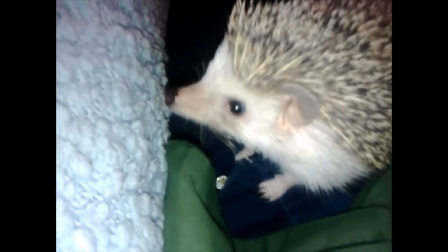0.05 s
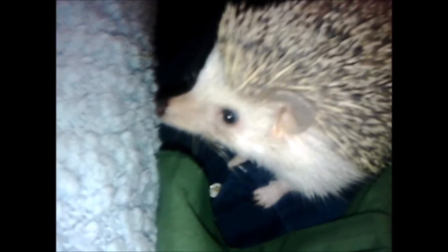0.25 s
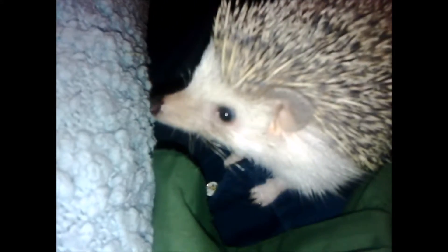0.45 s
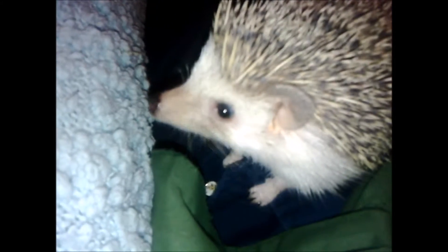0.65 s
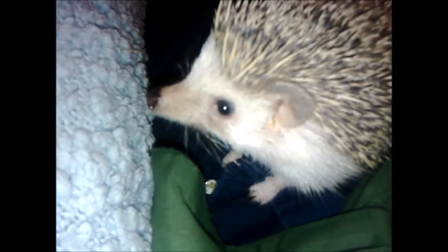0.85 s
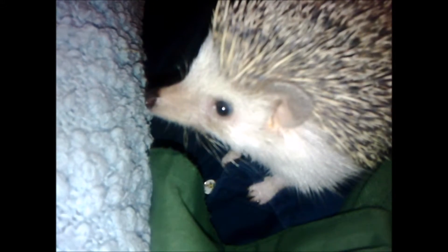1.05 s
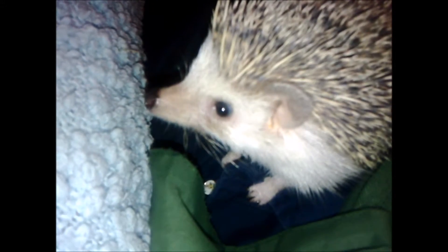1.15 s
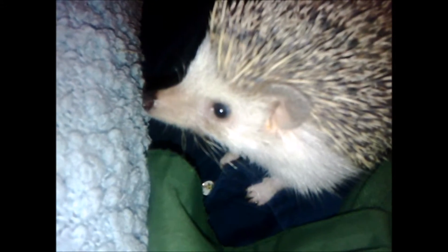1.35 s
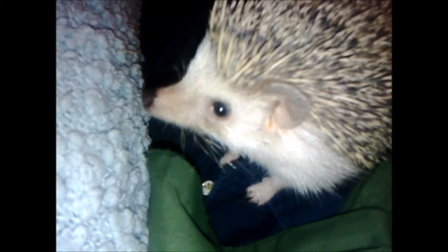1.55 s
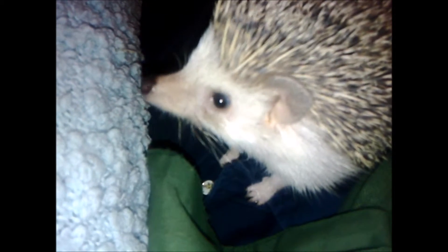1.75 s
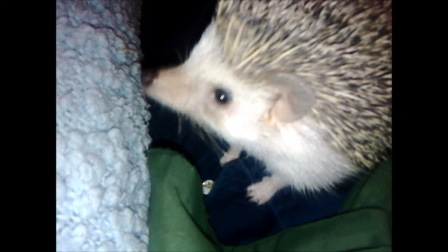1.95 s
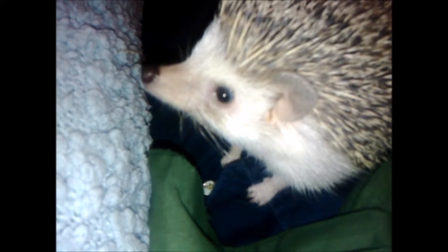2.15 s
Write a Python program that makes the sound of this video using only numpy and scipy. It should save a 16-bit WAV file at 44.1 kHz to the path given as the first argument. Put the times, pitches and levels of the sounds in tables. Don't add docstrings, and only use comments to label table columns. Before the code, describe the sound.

Crisp, hollow little clicks from a hedgehog nosing fleece, clustered early then sparse and faint, with a brief airy sniff and soft rustle at the start; very close stereo microphone, quiet room, steady hiss.

```python
import sys
import numpy as np
from scipy import signal
from scipy.fft import rfft, irfft
from scipy.io import wavfile

SR = 44100
rng = np.random.default_rng(int(sys.argv[2]) if len(sys.argv) > 2 else 0)


def transcribe(signal):
    frames = np.atleast_2d(signal).T
    limited = np.clip(frames, -1, 1)
    pcm = np.round(limited * 32767).astype(np.int16)
    wavfile.write(sys.argv[1], SR, pcm)


def undo_db(level):
    steps = np.asarray(level, float) / 20
    return 10 ** steps


N = 97020


def in_time(rows):
    times, values = np.transpose(rows)
    return np.interp(np.arange(N) / SR, times, values)


def rms_one(x):
    return x / np.sqrt(np.mean(x ** 2) + 1e-20)


def drift(rate_hz):
    r = np.exp(-2 * np.pi * rate_hz * 40 / SR)
    noise = rng.standard_normal(N // 40 + 2002)
    slow = signal.lfilter([1], [1, -2 * r, r * r], noise)[2000:]
    return np.interp(np.arange(N) / 40, np.arange(len(slow)), rms_one(slow))


def coloured(x, spectrum, patchy_db):
    hz, level_db = np.transpose(spectrum)
    octave = np.log2(np.maximum(np.arange(N // 2 + 1) * SR / N, 1))
    shaped = rfft(x) * undo_db(np.interp(octave, np.log2(hz), level_db, left=-80, right=-80))
    together = drift(16.5)
    total = np.zeros(N)
    for k in range(4, 15):
        band = irfft(shaped * np.clip(1 - abs(octave - k), 0, 1), N)
        total += band * undo_db(patchy_db * (0.74 * together + drift(54)))
    return rms_one(total)


def ring(x, hz, t60):
    r = undo_db(-60 / (t60 * SR))
    w = 2 * np.pi * hz / SR
    return signal.lfilter([0, np.sin(w)], [1, -2 * r * np.cos(w), r * r], x + 1e-18)


def low(x, hz):
    r = np.exp(-2 * np.pi * hz / SR)
    return signal.lfilter([1 - r], [1, -r], x)


def spread(mid, side, pan_db):
    return (mid + side * np.array([[1], [-1]])) * undo_db(np.array([[.5], [-.5]]) * pan_db)


def room():
    # (frequency [Hz], level [dB per Hz])
    rumble = [(12, -29), (20, -7), (48, -9), (124, 1), (195, -0.5), (312, -12.5), (401, -14), (1050, -19),
              (1500, -21.5), (1950, -58), (3300, -120)]
    mid = coloured(rng.standard_normal(N), rumble, patchy_db=2.5)
    side = coloured(rng.standard_normal(N), rumble, patchy_db=2.5)
    return undo_db(-61.5) * spread(mid, undo_db(-2.5) * side, 2.8)


def electronics():
    # (frequency [Hz], level [dB per Hz])
    alike = [(470, -34), (800, -25), (2350, -7.5), (5800, -8), (6650, -8), (7000, -6), (7830, -8),
             (12300, -4), (16000, -5.5)]
    # (frequency [Hz], level [dB per Hz])
    opposite = [(180, -49), (300, -12), (689, -15), (842, -24), (994, -26.5), (4910, -11), (7820, -13),
                (11500, -5), (16000, -8)]
    # (frequency [Hz], level [dB])
    whines = [(11041, -68), (12753, -68.5), (15256, -76)]
    whine_side_db = [10.5, 13.5, 12]
    # (time [s], level [dB])
    shared_level = [(0, 3.6), (.25, 1), (.6, -1.5), (.9, 0.5), (1.4, -0.1), (2.2, -0.5)]
    # (time [s], level [dB])
    gain = [(0, 2), (.3, -0.5), (.8, -0.5), (1.4, -0.7), (2.2, -1)]
    mid = undo_db(-56) * coloured(rng.standard_normal(N), alike, patchy_db=1.2)
    side = undo_db(-50) * coloured(rng.standard_normal(N), opposite, patchy_db=-1.2)
    for (hz, level_db), side_db in zip(whines, whine_side_db):
        height = np.sqrt(2) * undo_db(level_db + 0.4 * drift(17))
        phase = 2 * np.pi * hz * np.arange(N) / SR + 0.65 * drift(6)
        tone = height * np.sin(phase)
        mid = mid + tone
        side = side + undo_db(side_db) * tone
    return spread(undo_db(in_time(shared_level)) * mid, undo_db(in_time(gain)) * side, 0.7)


def rustle():
    # (frequency [Hz], level [dB per Hz])
    fleece = [(35, -34), (60, -4), (194, -2.5), (301, -15), (431, -4), (1060, -20.5), (1400, -13.5),
              (4340, -14.5), (7000, -30.5), (9100, -83), (15400, -120)]
    # (time [s], level [dB])
    effort = [(0.0, -55.5), (0.29, -64), (0.53, -66), (0.88, -76.5), (1.36, -71), (1.84, -74.5), (2.2, -70)]
    fibres_per_s = 440
    flicks = rng.random(N) < fibres_per_s / SR
    heights = undo_db(1.37 * np.minimum(rng.exponential(1, N), 5))
    ticks = flicks * heights * rng.choice([-1, 1], N)
    rubbing = rng.standard_normal(N) + undo_db(-5) * rms_one(ticks)
    mid = coloured(rubbing, fleece, patchy_db=1.2)
    side = undo_db(-6.5) * coloured(rng.standard_normal(N), fleece, patchy_db=4.0)
    return undo_db(in_time(effort) + 4.5) * spread(mid, side, 2)


def sniff():
    # (frequency [Hz], level [dB per Hz])
    breath = [(7500, -16), (9000, 3.5), (10500, -8), (13000, -5), (15500, -4)]
    end_s, fade_s = 0.2, 0.04
    fade = 1 / (1 + np.exp((np.arange(N) / SR - end_s) / fade_s * 3))
    mid = coloured(rng.standard_normal(N), breath, patchy_db=0.8)
    side = coloured(rng.standard_normal(N), breath, patchy_db=0.8)
    return undo_db(-61) * fade * spread(mid, undo_db(4) * side, 1.4)


def nudges():
    # (time [s], level [dB], frequency [Hz], length [s])
    nudge_table = [
        (0.105, -58.5, 440, 0.039),
        (1.256, -57.5, 470, 0.0079),
        (1.38, -60, 406, .012),
        (1.58, -62, 76.1, 0.016),
        (1.539, -57.5, 160, 0.026),
        (1.801, -60.5, 340, 0.0073),
        (1.841, -64.5, 590, 0.0082),
        (2.185, -56, 310, 0.031),
    ]
    t, noise = np.arange(N) / SR, rng.standard_normal(N)
    mid = np.zeros(N)
    for s, level_db, hz, length in nudge_table:
        swell = np.exp(-((t - s) / length) ** 2)
        tone = ring(ring(noise, hz, 4.0 / hz), hz, 4.0 / hz)
        mid += undo_db(level_db) * swell * rms_one(tone)
    return spread(mid, 0, 4.5)


def strike(at, level_db):
    taps = np.zeros((2, N))
    taps[:, at] = undo_db(level_db)
    return taps


def hollow_body(at, db, bright, sides):
    # (frequency [Hz], level [dB], 60 dB fade [s])
    modes = [(1466, -5.5, 0.008), (2340, -12, 0.0091), (3127, -12, 0.0072), (3930, -18, 0.0081),
             (5020, -26.5, 0.0048), (6050, -36, 0.0033), (8860, -35, 0.0023)]
    uneven_db = 0.6 * rng.normal(0, 1, (len(at), len(modes)))
    body = np.zeros((2, N))
    for k, (hz, level_db, t60) in enumerate(modes):
        tilt = bright * np.log2(hz / 1500)
        taps = strike(at, db + level_db + tilt + uneven_db[:, k] + sides)
        body -= (-1) ** k * ring(taps, hz, t60)
    body -= ring(strike(at, db - 17.5 + 1.28 * bright + sides), 4546, 0.0022)
    body = undo_db(7.5) * low(body - low(body, 2600), 8950)
    lag_s = 0.00004
    body[1] = np.roll(low(low(body[1], 3200), 7200), int(lag_s * SR))
    return body


def soft_thump(at, db, thump, sides):
    # (frequency [Hz], level [dB], 60 dB fade [s])
    modes = [(170.5, -14, 0.017), (333, -17.5, 0.021), (612, -16.5, 0.01)]
    soft = np.zeros((2, N))
    for k, (hz, level_db, t60) in enumerate(modes):
        taps = strike(at, db + level_db + thump + 0.72 * sides)
        soft += (-1) ** k * ring(taps, hz, t60)
    return signal.sosfilt(signal.butter(2, [93, 1800], "band", fs=SR, output="sos"), soft)


def noisy_tail(at, db, sides):
    t60_s = 0.045
    dying = signal.lfilter([1], [1, -undo_db(-60 / (t60_s * SR))], strike(at, db - 29.5 + sides) + 1e-18)
    tail = dying * rms_one(ring(rng.standard_normal(N), 1940, 0.00091))
    return signal.sosfilt(signal.butter(6, 4800, fs=SR, output="sos"), tail)


def clicks():
    # (time [s], peak [dB], brightness [dB per octave], thump [dB], left over right [dB])
    click_table = [(0.168, -39, -1, 0, 6), (0.208, -55, -6.48, -11, 14), (0.227, -14.5, -4.4, -5.5, 4.5),
                   (0.254, -46, -13, 10, 13), (0.306, -12.5, -1.3, -7, 5), (0.32, -20.5, -6.5, -1, 4),
                   (0.346, -36.5, 3, 4, 5.5), (0.375, -41, -4, 4.5, 11), (0.429, -35.5, 3, -4, 6),
                   (0.45, -12.5, 2.74, -4, 6), (0.497, -17.5, 3.2, -2, 6.5), (0.592, -16.5, 3.84, -0.5, 5),
                   (0.735, -18.5, -0.7, -0.5, 5.5), (0.878, -43.5, 8, 2, 5.5), (0.902, -22, -4, -1.5, 4),
                   (1.106, -31, 0.5, 8.5, 6), (1.123, -34, -1, 2, 7), (1.304, -46.5, 6, 11, 9),
                   (1.328, -34.5, 4, 10.5, 7), (1.458, -45, 8, 8.5, 3.5), (1.522, -46, 0.1, 8.5, 8),
                   (1.552, -46.5, 8.5, 13.5, 9.5), (1.75, -42, 3.5, 9, 6.5)]
    # (delay [s], level [dB])
    rebounds = [
        (.0043, -30),
        (.0052, -20),
        (.0065, -32),
    ]
    s, db, bright, thump, pan_db = np.transpose(click_table)
    at = ((s + 0.001005) * SR).astype(int)
    sides = np.array([[0.], [-1.]]) * pan_db
    body = hollow_body(at, db, bright, sides)
    again = np.zeros((2, N))
    for k, (delay, level_db) in enumerate(rebounds):
        again += (-1) ** k * undo_db(level_db) * np.roll(body, int(delay * SR), axis=1)
    return undo_db(6.5) * (body + again + soft_thump(at, db, thump, sides) + noisy_tail(at, db, sides))


def scene():
    thinner_hz = [6200, 10300]
    background = room() + electronics() + rustle()
    band = signal.butter(3, thinner_hz, "band", fs=SR, output="sos")
    shared = signal.sosfiltfilt(band, background.mean(axis=0))
    return background - 0.5 * shared + sniff() + nudges() + clicks()


def top_cut(x):
    return signal.sosfilt(signal.butter(12, 16240, fs=SR, output="sos"), x)


def record(dry):
    mix = signal.sosfilt(signal.cheby2(12, 70, 16300, fs=SR, output="sos"), dry)
    return top_cut(mix)


dry = scene()
out = record(dry)
transcribe(out)
```